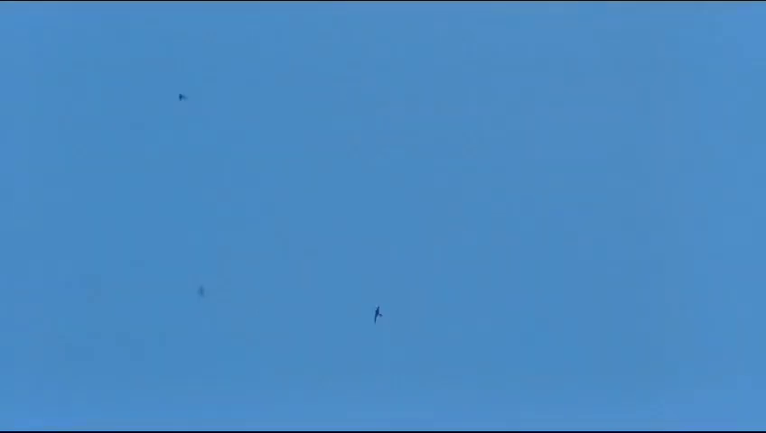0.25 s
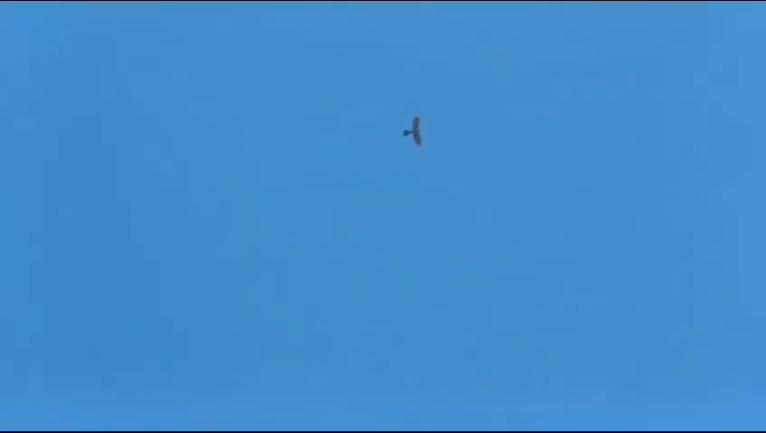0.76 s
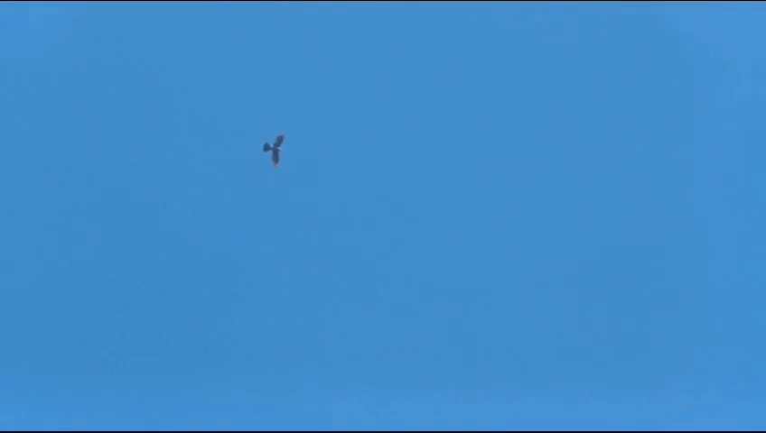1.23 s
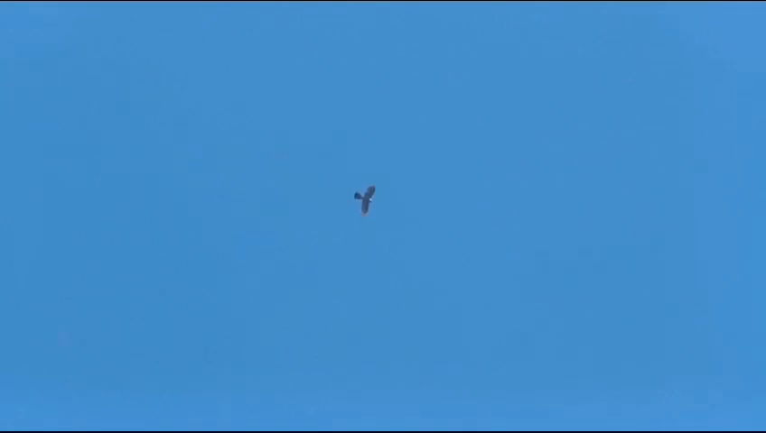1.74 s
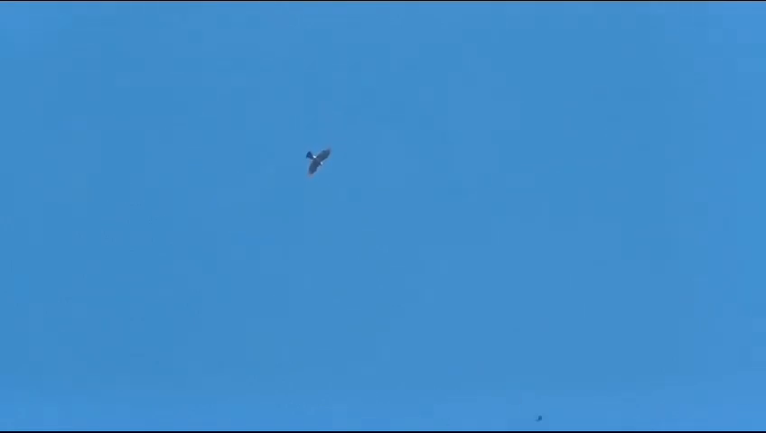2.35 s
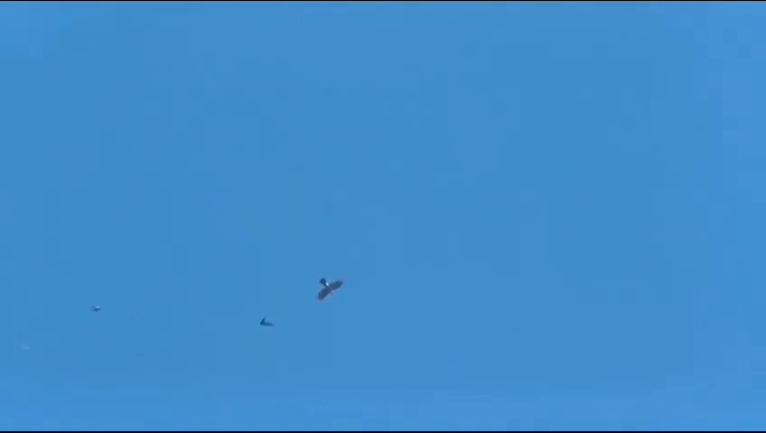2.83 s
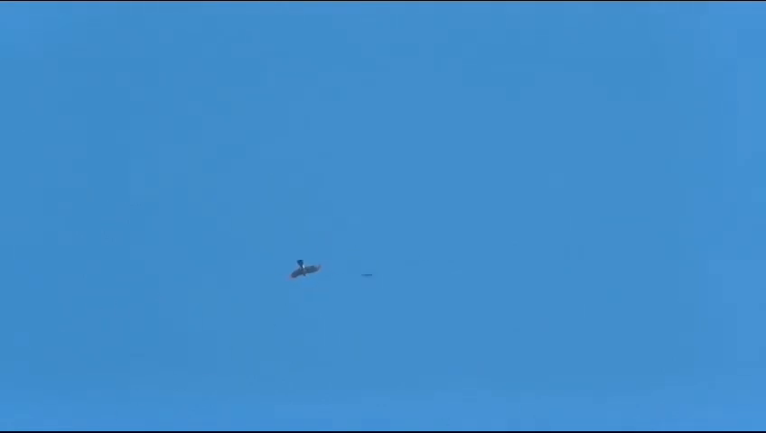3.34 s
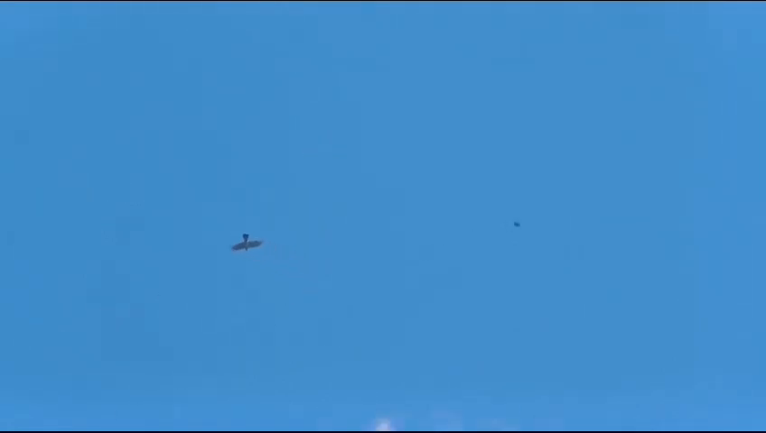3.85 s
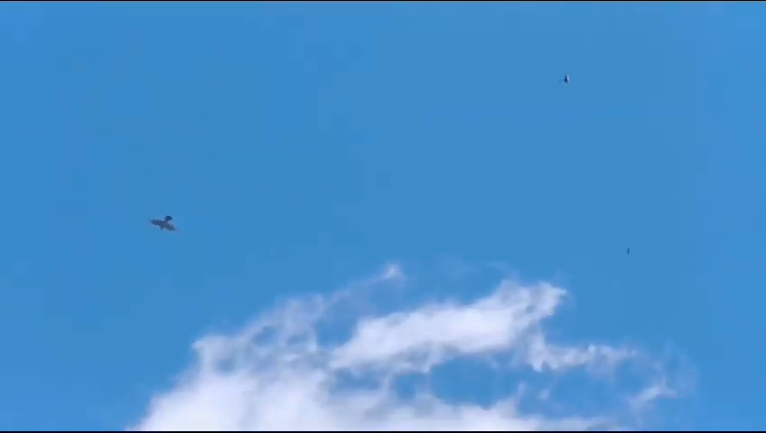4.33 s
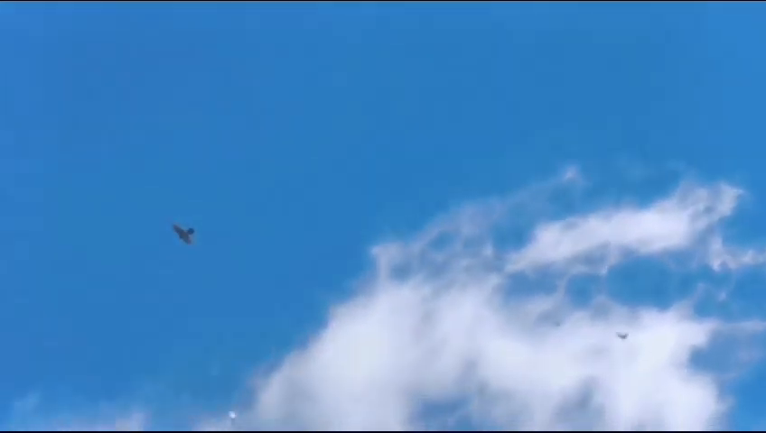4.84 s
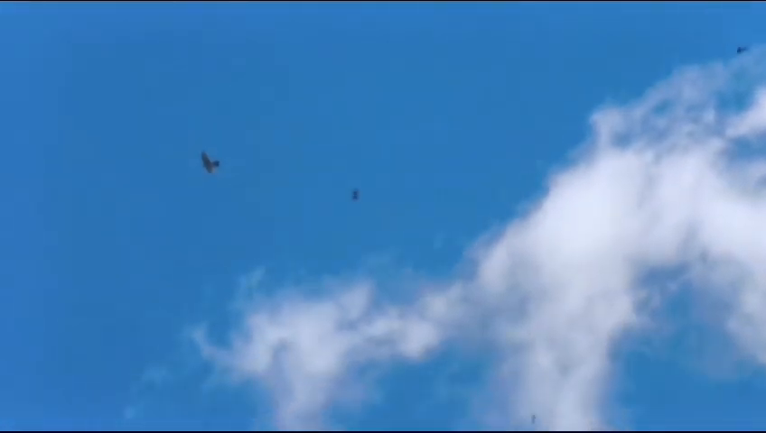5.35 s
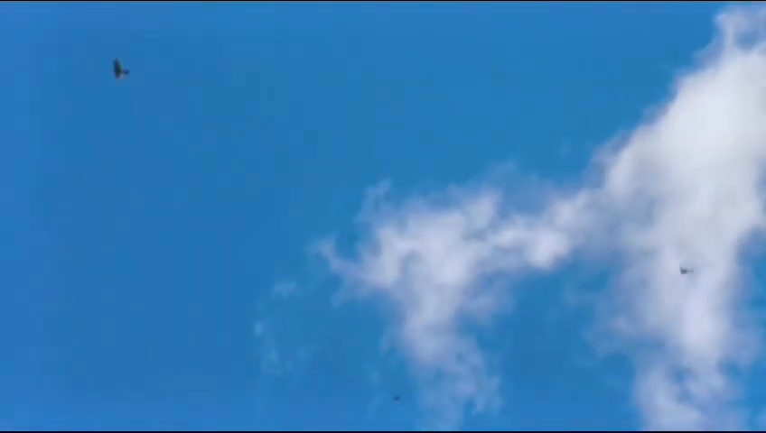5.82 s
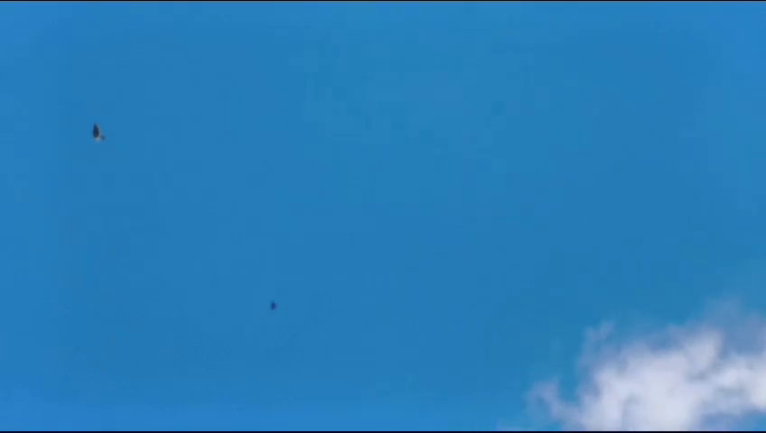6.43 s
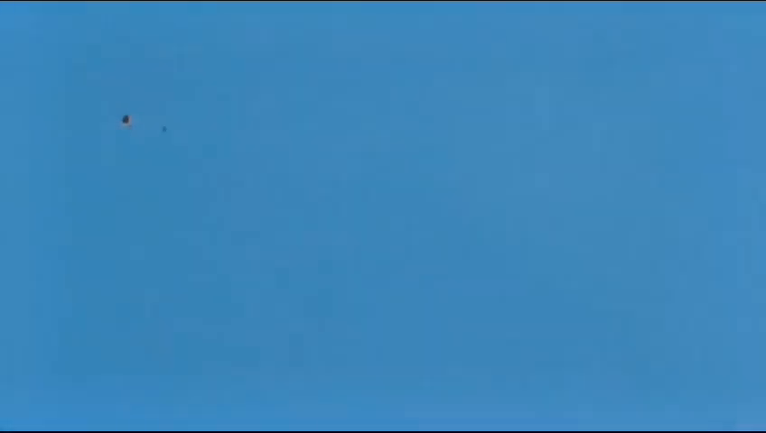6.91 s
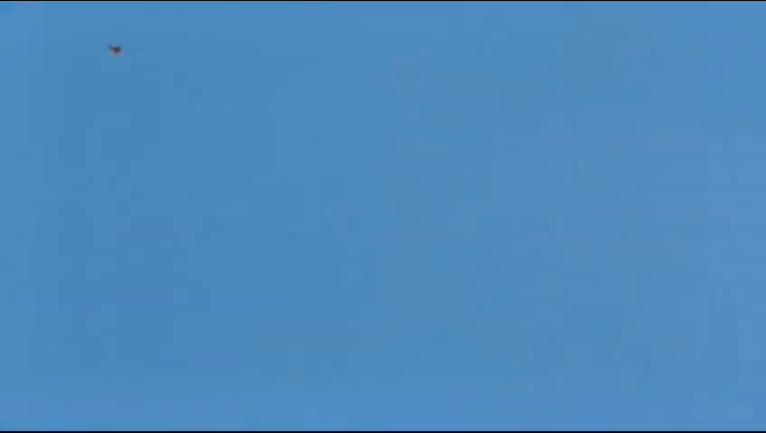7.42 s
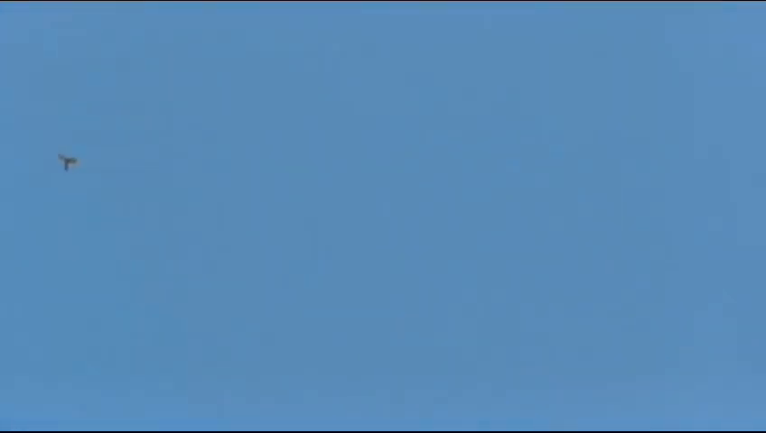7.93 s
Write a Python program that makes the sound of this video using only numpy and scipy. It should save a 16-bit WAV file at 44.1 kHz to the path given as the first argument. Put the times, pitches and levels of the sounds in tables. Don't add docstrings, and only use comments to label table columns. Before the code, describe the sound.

Open ground near a town, heard through a hand-held stereo phone with handling noise mostly on the right. Scrapes and ticks come first, then a clear thrush phrase ending in a rattling churr and a steep high squeak. Swallows flying overhead chirp in brief double-voiced squeaks, thickening after six seconds. Distant birds whistle upward softly. Low wind puffs, a quiet murmur and a thin wavering hum stay in the background.

```python
import sys
import numpy as np
from scipy import signal
from scipy.fft import rfft, irfft, next_fast_len
from scipy.io import wavfile
from scipy.ndimage import uniform_filter1d

SR = 44100
rng = np.random.default_rng(int(sys.argv[2]) if len(sys.argv) > 2 else 0)


def level_to_linear(level):
    exponent = np.asarray(level, float) / 20
    return 10 ** exponent


def wav_out(sig):
    wavfile.write(sys.argv[1], SR, np.round(np.clip(np.atleast_2d(sig).T, -1, 1) * 32767).astype(np.int16))


N = 360297
LEFT_LAG_SAMPLES = 15

# (start [s], length [s], top [Hz], end [Hz], bend of the fall [exponent], level [dB])
SWALLOW_ARCHES = [(0.729, 0.098, 6800, 4218, 4.44, -58), (0.732, 0.0706, 5613, 4377, 2, -43.5),
                  (0.924, 0.0712, 5438, 3950, 1.56, -51), (0.926, 0.1044, 6725, 3563, 4.23, -56.5),
                  (1.59, 0.124, 7140, 3900, 3.47, -63.5), (1.598, 0.0815, 5484, 4327, 2, -48.5),
                  (1.8, 0.101, 6913, 3873, 2.85, -59.5), (2.488, 0.086, 5500, 4200, 4.1, -49),
                  (2.677, 0.122, 6860, 4140, 5.4, -60), (3.404, 0.093, 5480, 3700, 3.8, -58.5),
                  (3.408, 0.081, 7420, 4000, 3.7, -68.5), (3.597, 0.0936, 6510, 3847, 4.45, -63.5),
                  (3.601, 0.0662, 5190, 3950, 1.24, -57.5), (3.8, 0.102, 6830, 4255, 4.2, -66),
                  (3.801, 0.087, 5350, 4023, 3.26, -57), (4.622, 0.097, 7190, 3660, 4.3, -63),
                  (4.63, 0.0768, 5790, 4204, 1.18, -51), (4.834, 0.104, 6650, 3980, 3.3, -73.5),
                  (4.835, 0.074, 5480, 4070, 1.32, -57), (5.788, 0.09, 5750, 4515, 1.13, -62),
                  (5.99, 0.069, 5710, 4440, 2.42, -59), (6.13, 0.0846, 6907, 4000, 5.6, -51),
                  (6.136, 0.075, 5584, 4040, 2.68, -47.5), (6.248, 0.056, 5500, 3980, 1.22, -53.5),
                  (6.256, 0.063, 6823, 4270, 2.9, -57.5), (6.467, 0.0606, 5688, 4400, 2.27, -48.5),
                  (6.471, 0.069, 7290, 4060, 3.1, -69), (6.731, 0.0884, 7156, 4010, 1.48, -55.5),
                  (7.303, 0.07, 5836, 4348, 1.344, -52.5), (7.304, 0.099, 7420, 4230, 2.3, -69),
                  (7.465, 0.074, 5445, 4366, 2.8, -52.5), (7.491, 0.0952, 6540, 4357, 7.94, -50),
                  (7.507, 0.0775, 5266, 4200, 2.1, -49.5), (7.824, 0.075, 5790, 4568, 1.47, -54),
                  (7.825, 0.088, 7170, 4330, 2.5, -69), (8.147, 0.07, 5820, 5720, 5.7, -55.5)]
# (frequency [Hz], gain [dB])
SWALLOW_THROAT = [(3300, -12), (4200, -4.5), (5400, -0.47), (6300, -3), (6900, -4), (7400, -15)]
# (time [s], pitch [Hz], level [dB], warble depth [Hz])
THRUSH_SONG = [
    [(.97, 2200, -57, 60), (1.03, 2032, -45, 59.6), (1.1, 1891, -48.5, 60.4), (1.17, 1737, -61, 60)],
    [(1.22, 2157, -65, 0), (1.24, 2179, -41.5, 0.0013), (1.285, 1978, -37.5, 0), (1.325, 2282, -35.5, 0),
     (1.37, 1990, -37, 0)],
    [(1.48, 4500, -58.5, 150), (1.51, 5110, -53.5, 150), (1.55, 4975, -47.5, 150)],
    [(1.552, 3134, -42.5, 140), (1.6, 3056, -38, 160), (1.685, 2924, -45.5, 160)],
    [(1.8, 2049, -55.5, 90), (1.86, 1990, -43.5, 70), (1.92, 1907, -45.5, 95.5), (1.95, 2121, -44, 20)],
    [(1.96, 2449, -45, 0.0011), (1.975, 2701, -38, 0), (2.03, 2611, -33.5, 0), (2.12, 2611, -35.5, 0),
     (2.14, 2420, -37, 0.0032)],
    [(2.14, 2071, -42, 0.0022), (2.165, 2210, -35.5, 0), (2.24, 2210, -39.5, 0),
     (2.275, 2157, -35.5, 0.0026)],
    [(2.795, 7340, -53, 199), (2.82, 5400, -48, 200), (2.85, 4190, -53.5, 200), (2.88, 4000, -61.5, 200)],
]
# (start [s], level [dB])
CHURR_SYLLABLES = [
    (2.391, -46),
    (2.452, -44.5),
    (2.513, -45),
    (2.574, -45),
    (2.64, -48),
]
# (time after its start [s], pitch [Hz], level [dB], warble depth [Hz])
CHURR_VOICES = [
    [(0, 2300, -5.5, 251.2), (.02, 4104, 0, 351.5), (.05, 4185, -1.5, 403.5)],
    [(0, 5000, -3.5, 304.2), (.015, 6000, -6, 450), (.05, 6000, -8, 491)],
]
# (time [s], pitch [Hz], level [dB], warble depth [Hz])
FAR_NOTES = [
    [(.25, 1090, -56, 0), (.33, 1092, -63, 0)],
    [(.6, 2960, -66, 80), (.68, 3478, -58, 80), (.735, 4103, -48.5, 80)],
    [(1.69, 3266, -59.5, 80), (1.78, 4000, -59, 80), (1.88, 4403, -60.5, 80)],
    [(3.0, 8350, -91, 0), (3.12, 7860, -82, 0.0013), (3.3, 7560, -87.5, 0)],
    [(3.84, 2946, -66, 80), (3.94, 3623, -55.5, 80), (4.03, 4225, -60, 80)],
    [(.97, 2772, -58, 60), (1.08, 2700, -67, 60)],
    [(4.5, 4740, -79, 50), (4.6, 4815, -72.5, 50)],
    [(5.02, 3105, -61, 80), (5.1, 3743, -53, 80), (5.17, 4342, -64, 80), (5.28, 4428, -68.5, 80)],
    [(5.07, 2153, -63.5, 30), (5.16, 2150, -71.5, 30), (5.25, 2400, -64, 30)],
    [(5.46, 5080, -70, 150), (5.54, 4900, -69, 150)],
    [(5.5, 3190, -67, 60), (5.7, 3090, -75.5, 60)],
    [(5.65, 2097, -57, 0), (5.69, 2088, -59, 0)],
    [(5.72, 2126, -72, 29.9), (5.85, 2300, -63, 30)],
    [(6.1, 2984, -57, 80), (6.18, 3581, -54.5, 80), (6.25, 4335, -61.5, 80)],
    [(6.62, 3160, -66.5, 59.6), (6.85, 3180, -69, 59.7)],
    [(7.11, 3035, -64, 80), (7.2, 3689, -53.5, 80), (7.3, 4350, -64.5, 80)],
    [(7.42, 3072, -61.5, 40.3), (7.6, 3030, -65.5, 40), (7.9, 3112, -68, 40)],
]
# (frequency [Hz], gain [dB])
LEFT_PORT_SHADE = [(500, 3), (1500, -3), (2400, -16.5), (4400, -12.5), (6800, -9.5), (7600, -17),
                   (11000, -5)]
# (frequency [Hz], gain [dB])
RIGHT_PORT_RESONANCE = [(6000, -0.1433), (6900, -1.5), (7600, -20.5), (9000, -9.5), (11000, -1.04)]
# (time [s], dull scrape level [dB], brighter part re dull [dB])
FINGER_SCUFFS = [
    [(.008, -65.5, 10), (.03, -50.5, 10), (.044, -50, 4), (.05, -26.5, -12), (.068, -22, -14.5),
     (.088, -30.5, -9.5), (.097, -69.5, -11.5)],
    [(.24, -68.5, 7), (.26, -63, 5), (.285, -71.5, 4.5), (.315, -61.5, 4), (.34, -55.5, 5.5),
     (.348, -34.5, -5.5), (.365, -38.5, -1), (.388, -40.5, -1), (.395, -58, 1), (.42, -64.5, 2.5)],
    [(.55, -78.5, 5.5), (.562, -62, 11.5), (.585, -70, 7.5), (.61, -75.5, 7.5)],
    [(4.9, -77.5, -2.5), (4.92, -63, 1), (4.95, -72.5, 0)],
    [(7.6, -73, 8), (7.635, -62.5, 7.5), (7.66, -71.5, 8), (7.72, -66.5, 4), (7.731, -40, -0.5),
     (7.745, -46.5, 1.5), (7.778, -56, 0.5), (7.795, -71, 4)],
]
# (frequency [Hz], density [dB per Hz])
SCUFF_DULL = [(40, 0), (120, -0.5), (270, -8), (700, -1), (1400, -5), (2500, -10), (4000, -36.5),
              (8000, -53.5)]
# (frequency [Hz], density [dB per Hz])
SCUFF_BRIGHT = [(800, -19.5), (1800, -1), (3300, 0), (5500, -2), (7700, -17), (10800, -10), (15800, -24.5)]
# (time [s], level [dB])
SKIN_RUSTLE = [(0.0, -87), (0.02, -75), (0.07, -29.5), (0.09, -46.5), (0.11, -85), (0.29, -85), (0.36, -48),
               (0.39, -55.5), (0.41, -67.5), (0.52, -75), (0.57, -69), (0.63, -70), (0.68, -59.5),
               (0.75, -64.5), (0.89, -59), (0.91, -78.5), (0.95, -64), (1.0, -72.5), (1.07, -71),
               (1.27, -85), (1.43, -64), (1.45, -82), (2.39, -81), (2.5, -66), (2.98, -83.5), (4.89, -82.5),
               (4.92, -67.5), (5.23, -89), (6.3, -73.5), (6.35, -66), (6.42, -81), (7.4, -71.5),
               (7.55, -78), (7.64, -55), (7.69, -69.5), (7.74, -41), (7.76, -47.5), (7.8, -75.5),
               (7.94, -77.5), (8.06, -64.5), (8.17, -72)]
# (time [s], peak level [dB])
FINGER_TICKS = [(0.1926, -49.5), (0.3097, -55), (0.347, -37.5), (0.4515, -49.5), (0.5648, -47),
                (0.6556, -51), (0.6695, -46.5), (0.6958, -39), (0.7334, -48), (0.7494, -46.5),
                (0.7733, -50), (0.8049, -42.5), (0.8443, -39.5), (0.9419, -56), (1.0889, -47),
                (1.1861, -53), (1.3839, -55), (1.4232, -49), (2.5223, -52.5), (3.4472, -62), (4.191, -56),
                (4.9172, -59), (4.9643, -60.5), (5.0146, -60.5), (5.039, -58), (6.6458, -54.5),
                (6.9105, -60), (7.1468, -55.5), (7.6099, -48.5), (7.6312, -45), (7.7033, -30),
                (7.733, -41.5), (7.9839, -59), (8.0113, -51)]
# (time [s], level [dB])
SLEEVE_RUSTLE = [(0, -80.5), (.5, -80.5), (2.4, -82.5), (2.6, -68), (2.9, -85.5), (6.8, -87), (6.92, -68),
                 (7.1, -76.5), (7.2, -73), (7.5, -77), (7.7, -79), (8.17, -73.5)]
# (time [s], level [dB])
WIND_GUSTS = [(0.0, -55.5), (0.04, -52.5), (0.09, -44.5), (0.18, -64.5), (0.27, -64), (0.36, -48),
              (0.45, -67), (0.95, -57), (1.36, -67.5), (2.0, -60), (2.09, -46.5), (2.21, -58.5),
              (2.27, -47), (2.46, -48.5), (2.52, -65), (2.84, -61), (2.93, -64), (3.16, -59.5), (3.41, -73),
              (3.5, -54), (3.59, -75), (3.66, -44), (3.75, -61.5), (4.69, -67.5), (4.85, -61),
              (5.46, -68.5), (6.19, -61.5), (6.24, -66), (6.39, -55), (6.46, -60.5), (7.62, -65.5),
              (7.74, -52.5), (7.8, -64), (7.87, -57), (8.01, -64.5), (8.17, -58.5)]
# (frequency [Hz], left density [dB per Hz], right density [dB per Hz])
TOWN_MURMUR = [(25, -81.5, -83), (80, -86.5, -84), (160, -88, -91.5), (600, -97.5, -91.5), (937, -96, -91),
               (1540, -102, -98.5), (2300, -108, -93.5), (4000, -111, -104), (6000, -118, -108),
               (7160, -117, -116), (9200, -118, -115), (10810, -120, -111), (12800, -121, -116),
               (15500, -124, -120)]
# (time [s], level [dB])
MOTOR_HUM = [(0, -70.5), (3, -72.5), (6.4, -70), (6.8, -82), (8.17, -93)]


def colour(x, hz, db):
    size = next_fast_len(N + 4096)
    log_hz = np.log(np.arange(1, size // 2 + 2) * SR / size)
    gain = level_to_linear(np.interp(log_hz, np.log(hz), db))
    return irfft(rfft(x, size) * gain, size)[..., :N]


def unit(x):
    return x / np.sqrt(np.mean(x ** 2))


def curve(s, values):
    return np.interp(np.arange(N) / SR, s, values)


def walk(rate_hz, count=N):
    hold = max(int(SR / rate_hz), 2)
    steps = np.repeat(rng.standard_normal(count // hold + 1), hold)
    return 1.299 * uniform_filter1d(uniform_filter1d(steps, hold), hold)[:count]


def add_tone(out, start_s, hz, gain, second_db, fifth_db=-70):
    first, count = int(start_s * SR), len(hz)
    phase = 2 * np.pi * np.cumsum(hz) / SR
    overtones = level_to_linear(second_db) * np.sin(2 * phase) + level_to_linear(fifth_db) * np.sin(5 * phase)
    tone = np.sin(phase) + (hz < 4000) * overtones
    ramp = np.arange(count)
    edge = np.minimum(ramp, ramp[::-1]) / (0.00334 * SR)
    out[first:first + count] += (np.sqrt(2) * tone * gain * np.minimum(edge, 1))[:N - first]


def whistle(table, warble_hz, flutter, second_db, fifth_db=-70):
    out = np.zeros(N)
    for note in table:
        s, hz, db, depth_hz = np.transpose(note)
        t = np.arange(s[0], s[-1], 1 / SR)
        pitch_hz = uniform_filter1d(np.interp(t, s, hz), int(0.01436 * SR), mode="nearest")
        warble = np.sin(2 * np.pi * warble_hz * t) + flutter * walk(3 * warble_hz, count=len(t))
        pitch_hz = pitch_hz + np.interp(t, s, depth_hz) * warble
        add_tone(out, s[0], pitch_hz, level_to_linear(np.interp(t, s, db)), second_db, fifth_db)
    return out


def swallows():
    out = np.zeros(N)
    for start_s, length_s, top_hz, end_hz, bend, db in SWALLOW_ARCHES:
        t = np.arange(0, 1.079 * length_s, 1 / SR)
        leap_hz = 2200 * np.exp(-t / .006)
        fall_hz = (top_hz - end_hz) * (t / length_s) ** bend
        drop_hz = 250 * (t / length_s) ** 9
        hz = top_hz - leap_hz - fall_hz - drop_hz
        effort_db = (top_hz > 6200) * 8 * (t / length_s - .6)
        throat_db = np.interp(hz, *np.transpose(SWALLOW_THROAT))
        flutter_db = 2.15 * walk(88.7, count=len(t))
        gain = level_to_linear(db + 1.0 + effort_db + throat_db + flutter_db)
        add_tone(out, start_s, hz + 25 * walk(300, count=len(t)), gain, second_db=-60)
    return out


def thrush():
    churr = []
    for start_s, db in CHURR_SYLLABLES:
        for voice in CHURR_VOICES:
            churr.append(np.add(voice, (start_s, 0, db, 0)))
    song = whistle(THRUSH_SONG, warble_hz=95, flutter=0.4853, second_db=-36, fifth_db=-47.5)
    return song + whistle(churr, warble_hz=210, flutter=1.194, second_db=-29)


def far_birds():
    return whistle(FAR_NOTES, warble_hz=70, flutter=0.778, second_db=-49)


def outdoors(x, wet_db, t60_s, build_s, slap_s, slap_db, dull_db):
    t = np.arange(int(.9 * SR)) / SR
    tail = rng.standard_normal((2, len(t))) * level_to_linear(-60 * t / t60_s) * np.minimum(t / build_s, 1) ** 2
    tail *= level_to_linear(wet_db) / np.sqrt(np.sum(tail ** 2, axis=1, keepdims=True))
    tail[:, int(slap_s * SR)] += level_to_linear(slap_db)
    echoes = signal.fftconvolve(x[None], tail, axes=1)[:, :N]
    echoes = colour(echoes, [5400, 7000], [0, dull_db])
    left, right = echoes + [np.roll(x, LEFT_LAG_SAMPLES), x]
    left = colour(left, *np.transpose(LEFT_PORT_SHADE))
    return np.array([left, colour(right, *np.transpose(RIGHT_PORT_RESONANCE))])


def scuffs():
    dull = unit(colour(rng.standard_normal(N), *np.transpose(SCUFF_DULL)))
    bright = unit(colour(rng.standard_normal(N), *np.transpose(SCUFF_BRIGHT)))
    out = np.zeros(N)
    for scuff in FINGER_SCUFFS:
        s, db, bright_db = np.transpose(scuff)
        contact = uniform_filter1d(curve([s[0], s[0], s[-1], s[-1]], [0, 1, 1, 0]), 300)
        out += contact * level_to_linear(curve(s, db) + 6) * (dull + bright * level_to_linear(curve(s, bright_db)))
    return out * level_to_linear(2.075 * walk(250))


def ticks():
    s, peak_db = np.transpose(FINGER_TICKS)
    clicks = np.zeros(N)
    clicks[(s * SR).astype(int)] = level_to_linear(peak_db + 17)
    return colour(clicks, [800, 2500, 6000, 7600, 11000, 15800], [-25.5, -1, 4, -11, 2.94, -11.5])


def fingers():
    grain_db = 3.13 * rng.exponential(size=(2, N)) + 3.9 * np.array([walk(27), walk(60)])
    grains = rng.standard_normal((2, N)) * level_to_linear(grain_db)
    cloth = unit(colour(grains[0], [6000, 8500, 12500, 15800], [-20, -5, -1.5, -5.5]))
    skin = unit(colour(grains[1], [1500, 5000, 7600, 9000, 11000, 13500, 15800],
                       [-4.5, 0, -20.5, -11, -0.78, -16.5, -14.5]))
    right = scuffs() + skin * level_to_linear(curve(*np.transpose(SKIN_RUSTLE)) + 5.0) + ticks()
    thud = colour(right, [100, 400, 900], [-27, -30, -60])
    return np.array([thud + cloth * level_to_linear(curve(*np.transpose(SLEEVE_RUSTLE))), right])


def wind():
    puffs = rng.standard_normal((3, N))
    rumble = colour(puffs[:2] + 0.897 * puffs[2], [12, 25, 50, 90, 200, 500], [-7, 5.64, 2.5, -10.5, -32, -60])
    tilt_db = np.array([[3.0], [-1.5]])
    flutter_db = 2 * np.array([walk(12), walk(12)])
    return unit(rumble) * level_to_linear(curve(*np.transpose(WIND_GUSTS)) + tilt_db + flutter_db)


def town():
    hz, left_db, right_db = np.transpose(TOWN_MURMUR)
    common, own = rng.standard_normal(N), rng.standard_normal((2, N))
    ports = np.array([np.roll(common, LEFT_LAG_SAMPLES), common])
    ports = colour(ports, [300, 900, 3000], [-.5, -3, -8]) + colour(own, [300, 900, 3000], [-8, -3, -.7])
    ports *= np.sqrt(SR / 2) * level_to_linear(1.0 * walk(1.459) + 1.03 * walk(14))
    return np.array([colour(ports[0], hz, left_db), colour(ports[1], hz, right_db)])


def motor():
    hz = 391.6 + 1.522 * walk(5)
    level_db = curve(*np.transpose(MOTOR_HUM)) + 2 * walk(9.7)
    return np.sqrt(2) * np.sin(2 * np.pi * np.cumsum(hz) / SR) * level_to_linear(level_db)


def scene():
    high = outdoors(swallows(), wet_db=-4, t60_s=0.443, build_s=0.0373, slap_s=0.073, slap_db=-13.5, dull_db=-0.5)
    tree = outdoors(thrush(), wet_db=-3.5, t60_s=0.585, build_s=0.01096, slap_s=.04, slap_db=-9, dull_db=0)
    far = outdoors(far_birds(), wet_db=0.0, t60_s=0.59, build_s=0.0352, slap_s=.05, slap_db=-11, dull_db=-5.5)
    return high + tree + far + fingers() + wind() + town() + motor()


def low_pass(x):
    return signal.sosfilt(signal.butter(12, 15940, fs=SR, output="sos"), x)


def record(dry):
    return low_pass(dry)


dry = scene()
out = record(dry)
wav_out(out)
```